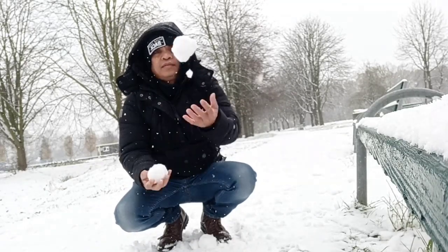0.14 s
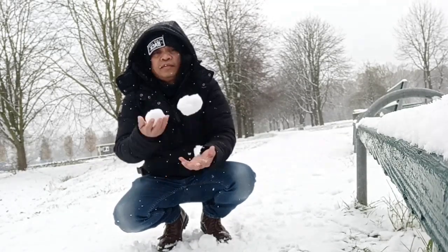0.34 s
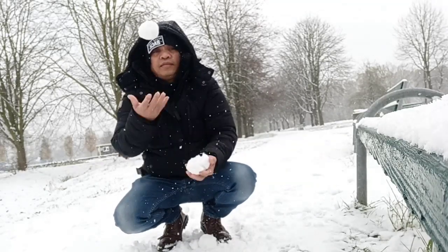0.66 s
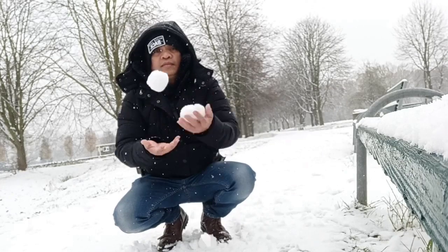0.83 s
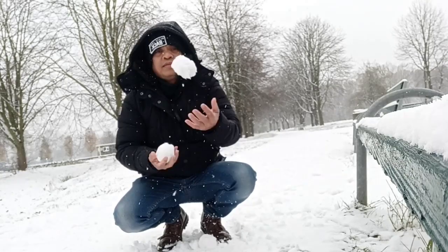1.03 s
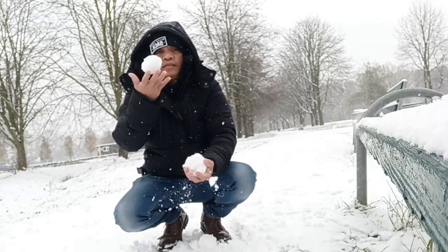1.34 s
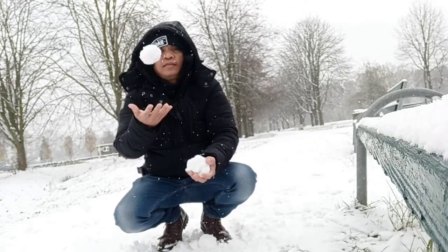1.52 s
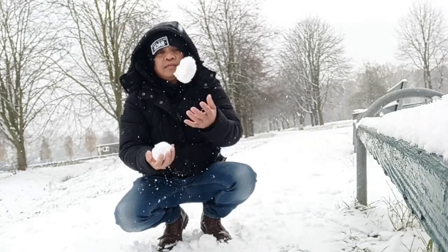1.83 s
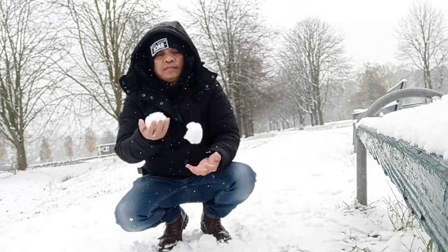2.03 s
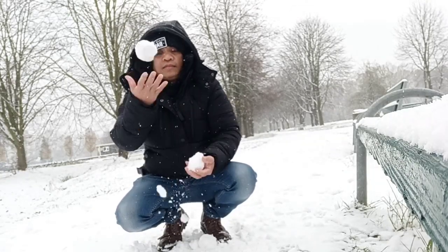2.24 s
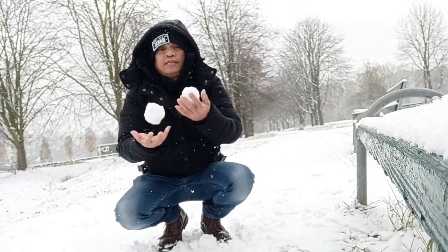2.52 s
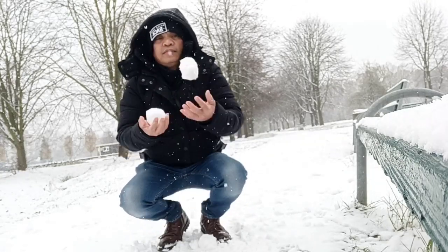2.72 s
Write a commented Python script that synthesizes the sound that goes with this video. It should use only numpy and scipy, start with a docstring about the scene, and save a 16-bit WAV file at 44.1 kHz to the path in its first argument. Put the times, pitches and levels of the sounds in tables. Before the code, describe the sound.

Snowballs juggled in bare hands, soft crunches and swishing jacket sleeves in a quiet winter park

```python
"""Juggling snowballs in a winter park

Someone juggles two snowballs in a quiet park, a few metres from the microphone.
Jacket sleeves swish: dense random slips of cloth swell and fade with the arm movements.
Snow crunches softly in bare hands: short bursts of ice grains, with a ringing cupped palm.
Behind are distant birds (blurred gliding tones), a noise wash of far traffic with a narrow
throbbing drone, and a faint hum of wavering tones."""
import sys
import numpy as np
from scipy import signal
from scipy.fft import rfft, irfft, next_fast_len
from scipy.io import wavfile

SR = 44100
rng = np.random.default_rng(int(sys.argv[2]) if len(sys.argv) > 2 else 0)


def generate_wav(signal):
    """Clip the signal to [-1, 1] and save it as 16-bit WAV at the path in sys.argv[1]."""
    frames = np.transpose(np.atleast_2d(signal))
    scaled = np.clip(frames, -1, 1) * 32767
    pcm = np.round(scaled).astype(np.int16)
    wavfile.write(sys.argv[1], SR, pcm)


N = 126567
TIME = np.arange(N) / SR
HZ = np.fft.rfftfreq(2 * next_fast_len(N // 2 + 1), 1 / SR)


def amp(db):
    """Decibels to gain."""
    return 10 ** (np.asarray(db) / 20)


def unit(x):
    """Scales to an rms of one."""
    return x / np.sqrt(np.mean(x ** 2) + 1e-20)


def spectrum(points):
    """Gains at all frequencies from (freq_hz, level_db) points, joined on a log frequency axis."""
    hz, db = np.transpose(points)
    return amp(np.interp(np.log(HZ + 1), np.log(hz + 1), db))


def level(points):
    """Gains at all times from (time_s, level_db) points."""
    return amp(np.interp(TIME, *np.transpose(points)))


def shaped(x, gains):
    """Filters x by a gain for each frequency."""
    return irfft(rfft(x, 2 * (len(HZ) - 1)) * gains)[:N]


def drift(hz):
    """Random motion with an rms of one, mostly slower than the given rate."""
    return unit(shaped(rng.standard_normal(N), np.exp(-(HZ / hz) ** 2)))


def grains(per_s, spread_db):
    """Tiny clicks of uneven size at random moments."""
    size = amp(spread_db * np.minimum(rng.exponential(1, N), 4))
    sign = rng.choice([-1, 1], N)
    present = rng.random(N) < per_s / SR
    return size * sign * present


# Arm movements that rub the jacket, a few metres away:
# peak_s, rise_s, fall_s, level_db, sheen_db (extra level of the top treble)
ARM_STROKES = [(.105, 0.088, 0.07, -64.5, 4), (.305, 0.064, 0.11, -67, 6), (.51, 0.078, 0.075, -64.5, 3.5),
               (.68, 0.091, 0.17, -67.5, 5.5), (.838, 0.035, 0.067, -61, 1.5),
               (.965, 0.057, 0.074, -60, 1.5), (1.10, 0.018, 0.032, -65.5, 3),
               (1.22, 0.046, 0.04, -67.5, 0), (1.285, 0.028, .03, -66, 7.5), (1.345, 0.029, 0.062, -60, 1),
               (1.53, 0.025, 0.09, -66, 4), (1.72, 0.055, 0.066, -65.5, 1.5),
               (1.908, 0.049, 0.062, -58, 0.5), (2.115, 0.053, 0.07, -63.5, 5),
               (2.19, 0.058, 0.06, -60.5, -0.5), (2.44, 0.041, .04, -67, 3), (2.505, 0.03, 0.032, -63.5, 3),
               (2.58, 0.04, 0.078, -61.5, 0), (2.845, 0.06, 0.05, -69, 0)]
# Tone of rubbing cloth: freq_hz, level_db (relative)
CLOTH_TONE = [(200, 4.5), (700, 10.5), (1500, 6), (2500, -11.5), (4500, 3.5), (7000, 3.5), (12000, 3),
              (16000, 5)]
CLOTH_GRAINS_PER_S, CLOTH_SPREAD_DB = 9000, 0.5
FLUTTER_DB, FLUTTER_HZ = 1.03, 49
SHEEN_HZ = 9700  # the sheen lies above this


def sleeves():
    """Dense slips of cloth swell and fade with each arm movement; some have more sheen."""
    slips = unit(shaped(grains(CLOTH_GRAINS_PER_S, CLOTH_SPREAD_DB), spectrum(CLOTH_TONE)))
    sheen = shaped(slips, 1 - 1 / (1 + (HZ / SHEEN_HZ) ** 10))
    body = slips - sheen
    body_power, sheen_power = 0, 0
    for peak_s, rise_s, fall_s, level_db, sheen_db in ARM_STROKES:
        width_s = np.where(TIME < peak_s, rise_s, fall_s)
        stroke_power = amp(level_db) ** 2 * np.exp(-((TIME - peak_s) / width_s) ** 2)
        body_power = body_power + stroke_power
        sheen_power = sheen_power + stroke_power * amp(sheen_db) ** 2
    rub = body * np.sqrt(body_power) + sheen * np.sqrt(sheen_power)
    return rub * amp(FLUTTER_DB * drift(FLUTTER_HZ))


# Snow crushed in the bare hand: start_s, length_s, level_db,
# tilt_db (per octave, well above the knee), knock_db (of the palm), low_edge_hz
CRUNCH_EVENTS = [(0.5345, 0.0058, -53.5, -6, -52, 800), (0.545, 0.0037, -64, -1, -66, 1000),
                 (0.557, 0.0013, -54.5, -6.5, -60, 700), (1.026, 0.0043, -56, -2.5, -68, 2300),
                 (1.385, 0.0087, -56, -2, -69, 1400), (1.823, 0.0077, -59, -2, -68, 900),
                 (2.2, 0.0047, -60, -1, -58, 1100), (2.218, 0.004, -65, -7, -69, 1100),
                 (2.279, 0.0031, -60.5, -14, -62, 1600), (2.587, 0.003, -58.5, -16, -73, 7000),
                 (2.6504, 0.0082, -58, -1.5, -60, 1200)]
# Modes of the cupped hand: pitch_hz, level_db (relative to the knock), t60_s
PALM_MODES = [(800, 1, 0.028), (1485, 3.5, 0.038), (2280, -8, .02)]
CRUNCH_ATTACK_S, CRUNCH_RELEASE_S, CRUNCH_KNEE_HZ = 0.0011, 0.0024, 1070
SNOW_GRAINS_PER_S, SNOW_SPREAD_DB = 13000, 1


def snow():
    """Each crunch breaks a short burst of ice grains and rings the decaying modes of the cupped palm."""
    out = np.zeros(N)
    ice = grains(SNOW_GRAINS_PER_S, SNOW_SPREAD_DB)
    for start_s, length_s, level_db, tilt_db, knock_db, low_edge_hz in CRUNCH_EVENTS:
        age = np.clip(TIME - start_s, 0, .2)
        tilt = amp(tilt_db * np.log2(1 + HZ / CRUNCH_KNEE_HZ))
        low_cut = (HZ ** 2 / (HZ ** 2 + low_edge_hz ** 2)) ** 2
        attack = np.minimum(age / CRUNCH_ATTACK_S, 1)
        press = attack * np.exp(-np.clip((age - length_s) / CRUNCH_RELEASE_S, 0, 20))
        burst = unit(shaped(press * ice, tilt * low_cut))
        # the rms of the press makes the level that of the burst itself, not of the whole scene
        out += amp(level_db) * burst * np.sqrt(np.mean(press ** 2))
        for pitch_hz, mode_db, t60_s in PALM_MODES:
            decay = np.exp(-np.log(1000) * age / t60_s)
            ring = decay * np.sin(2 * np.pi * pitch_hz * age)
            out += attack * amp(knock_db + mode_db) * ring
    return out


def blurred(hz, rough, blur_hz):
    """A gliding tone, partly smeared into narrow noise."""
    turn = 2 * np.pi * np.cumsum(hz) / SR
    rough = np.clip(rough, 0, 1)
    in_phase = (1 - rough + rough * drift(blur_hz)) * np.sin(turn)
    quadrature = rough * drift(blur_hz) * np.cos(turn)
    return unit(in_phase + quadrature)


# Chirps of a small distant bird: start_s, length_s, top_pitch_hz,
# arch (share of the pitch that rises and falls), level_db, roughness (0-1)
CHIRPS = [(0.976, 0.0275, 3880, 0.14, -65.5, 0.75), (1.021, 0.0296, 3880, 0.1, -67.5, 0.85),
          (1.082, .03, 3900, .14, -74, .9), (1.138, 0.02, 3780, .1, -74.5, .8),
          (1.24, .025, 4020, 0.1, -75.5, .8)]
# Hoarse cry of a far bird: time_s, pitch_hz, level_db
FAR_CRY = [(2.48, 1254, -76), (2.516, 1299, -66), (2.555, 1304, -65), (2.59, 1263, -61), (2.622, 1215, -64),
           (2.65, 1180, -85)]
CHIRP_BLUR_HZ = 300
CRY_ROUGHNESS, CRY_BLUR_HZ = .45, 220


def birds():
    """A fading run of thin arched chirps and one hoarse cry that ends falling, blurred by distance."""
    when, pitch, loudness_db = np.transpose(FAR_CRY)
    # silent before and after the cry
    cry_gain = amp(np.interp(TIME, when, loudness_db, -np.inf, -np.inf))
    out = cry_gain * blurred(np.interp(TIME, when, pitch), CRY_ROUGHNESS, CRY_BLUR_HZ)
    for start_s, length_s, top_hz, arch, level_db, roughness in CHIRPS:
        bow = np.sin(np.pi * np.clip((TIME - start_s) / length_s, 0, 1))
        chirp = blurred(top_hz * (1 - arch + arch * bow), roughness, CHIRP_BLUR_HZ)
        out += amp(level_db) * np.sqrt(abs(bow)) * chirp
    return out


# Tone of far traffic and still air: freq_hz, level_db (relative)
AIR_TONE = [(20, -67), (32, -31.5), (48, -20.5), (62, -7), (105, -5.5), (140, -2), (220, -5.5),
            (290, -11.5), (460, -17.5), (720, -16.5), (1000, -21), (1500, -24.5), (2200, -33), (4000, -38),
            (7000, -43.5), (15500, -34)]
# Gain of the middle of the traffic noise: time_s, level_db
MIDDLE_SWELL = [(0, -.5), (.45, -1), (.6, 3.5), (.97, 2.5), (1.12, -0.5), (1.48, 0.5), (1.65, 0.5),
                (1.85, -1), (2.87, 0)]
# Level of the drone: time_s, level_db
DRONE_LEVEL = [(0, -58), (.09, -50.5), (.22, -63), (.6, -58), (1.1, -54), (1.25, -53.5), (1.5, -53.5),
               (1.66, -51), (1.75, -60.5), (1.83, -50), (2.0, -51), (2.45, -50), (2.54, -58), (2.65, -50.5),
               (2.87, -54.5)]
AIR_DB = -54
MIDDLE_HZ, MIDDLE_OCTAVES = 580, 0.74
DRONE_HZ, DRONE_WIDTH_HZ = 179.56, 31.2


def traffic():
    """A dull noise wash whose middle swells a little, with a throbbing drone of narrow noise."""
    wash = amp(AIR_DB) * unit(shaped(rng.standard_normal(N), spectrum(AIR_TONE)))
    octaves_away = np.log2((HZ + 1) / MIDDLE_HZ)
    middle = shaped(wash, np.exp(-(octaves_away / MIDDLE_OCTAVES) ** 2))
    turn = 2 * np.pi * DRONE_HZ * TIME
    drone = unit(drift(DRONE_WIDTH_HZ) * np.cos(turn) + drift(DRONE_WIDTH_HZ) * np.sin(turn))
    return wash + middle * (level(MIDDLE_SWELL) - 1) + level(DRONE_LEVEL) * drone


# Hum of far machinery: start_hz, end_hz, start_db, end_db
HUM_TONES = [(99.1, 99.6, -64.5, -65.5), (251.3, 250, -64, -70.5), (754.6, 744, -71.5, -70.5),
             (799, 880, -72, -91), (1196, 1196, -80.5, -88)]


def hum():
    """Faint tones of far machinery, wavering in pitch and level, glide slowly and change in strength."""
    out, progress = 0, TIME / TIME[-1]
    for start_hz, end_hz, start_db, end_db in HUM_TONES:
        glide = start_hz + (end_hz - start_hz) * progress
        pitch = glide * (1 + 0.00391 * drift(5.83))
        swell = amp(start_db + (end_db - start_db) * progress)
        tone = np.sin(2 * np.pi * np.cumsum(pitch) / SR)
        out += swell * unit(tone * amp(2.8 * drift(3.0)))
    return out


def scene():
    """All sources in the open air, without echo over the snow."""
    return (sleeves() + snow() + birds() + traffic() + hum())[None]


# Stepped treble colour of the whole sound, corner frequencies: freq_hz
COLOUR_FREQ_HZ = [0, 4650, 4800, 6000, 6180, 7550, 7750, 8450, 8650, 11500, 11700, 12850, 13100, 15500]
# Gain at those frequencies: level_db
COLOUR_LEVEL_DB = [-0.5, -2, -7.5, -4, 5.5, 10.5, 6, -1.5, -17, -24.5, -9, -13, -5, -7.5]
EDGE_HZ = 15550  # upper band limit


def record(dry):
    """Uneven, stepped treble with dull bands, then a steep low-pass."""
    coloured = shaped(dry[0], amp(np.interp(HZ, COLOUR_FREQ_HZ, COLOUR_LEVEL_DB)))
    edge = signal.firwin(1023, EDGE_HZ, window=("kaiser", 9), fs=SR)
    return signal.oaconvolve(coloured, edge, "same")[None]


dry = scene()
out = record(dry)
generate_wav(out)
```